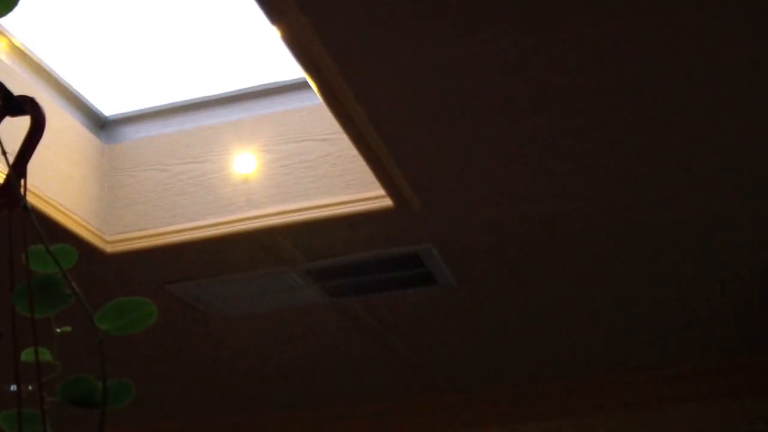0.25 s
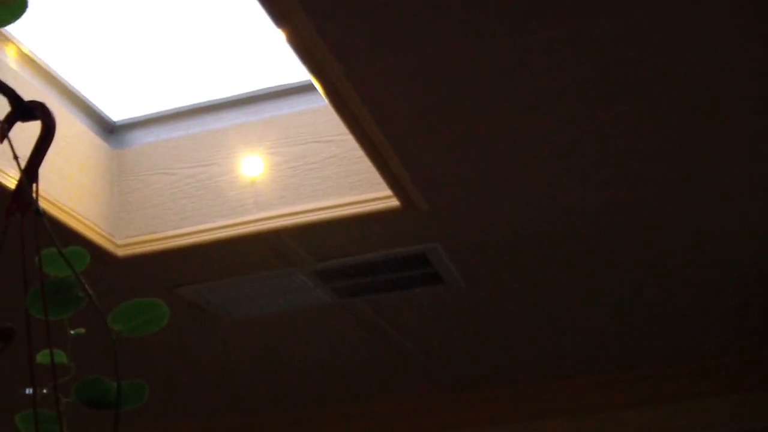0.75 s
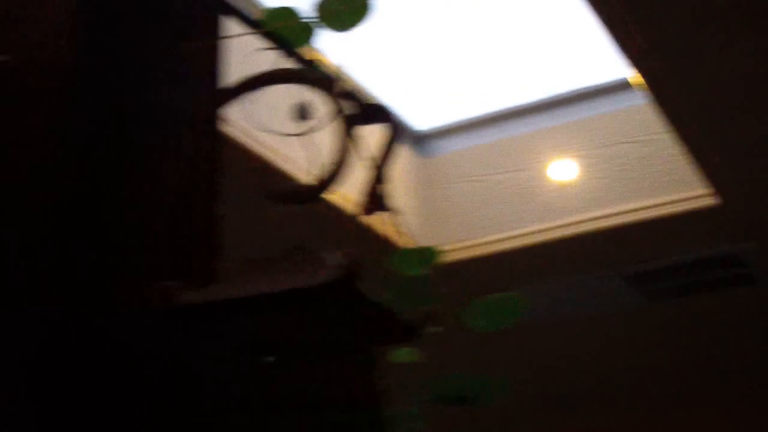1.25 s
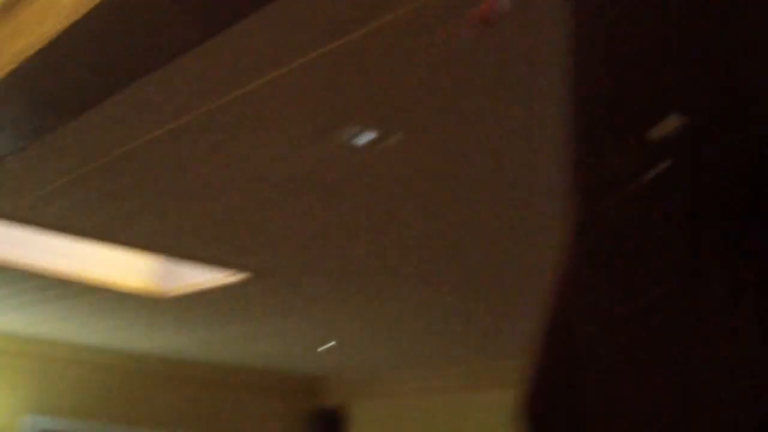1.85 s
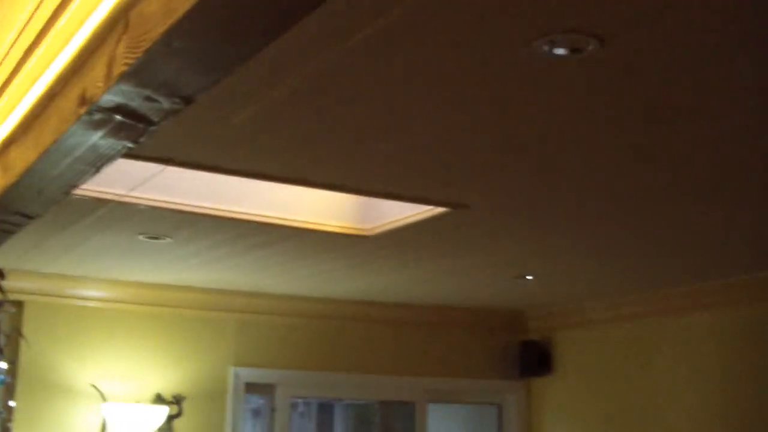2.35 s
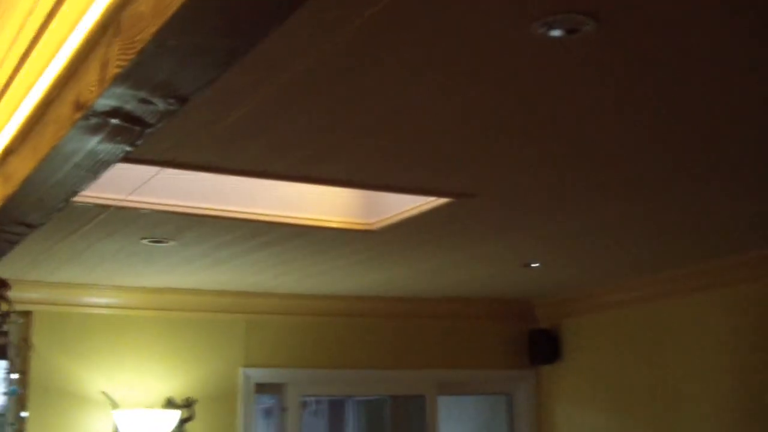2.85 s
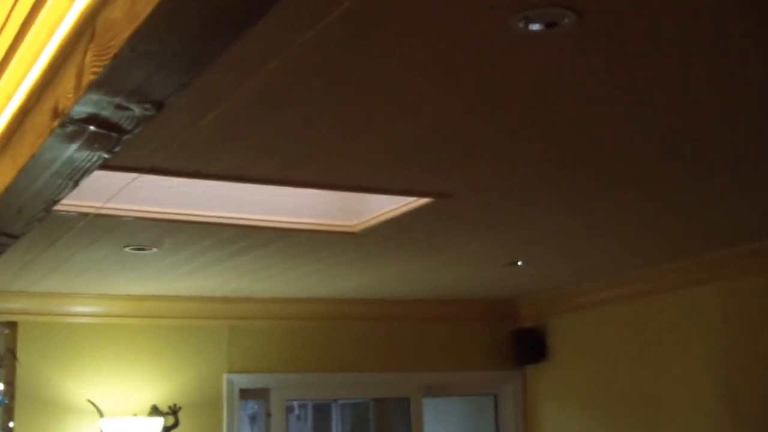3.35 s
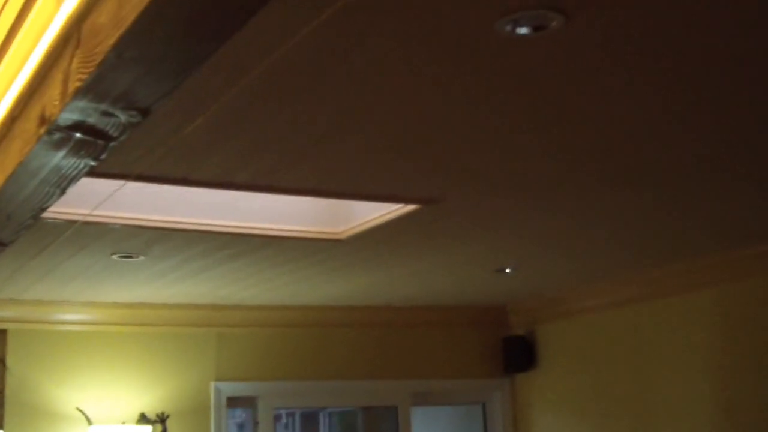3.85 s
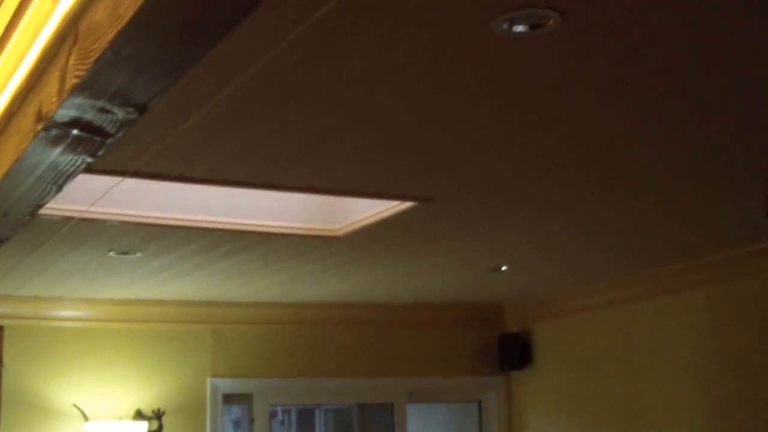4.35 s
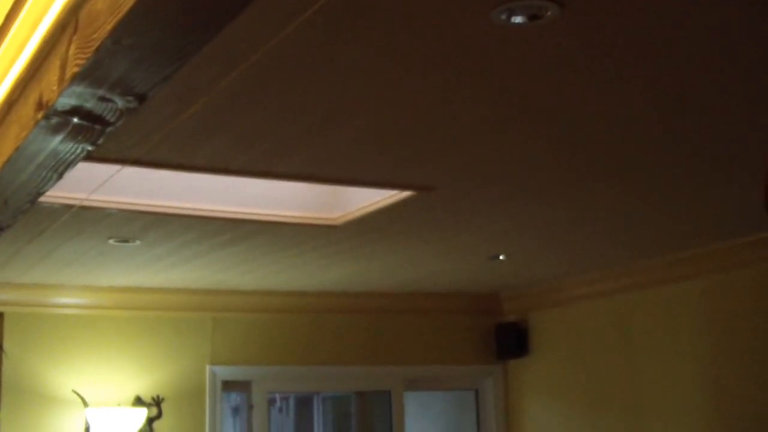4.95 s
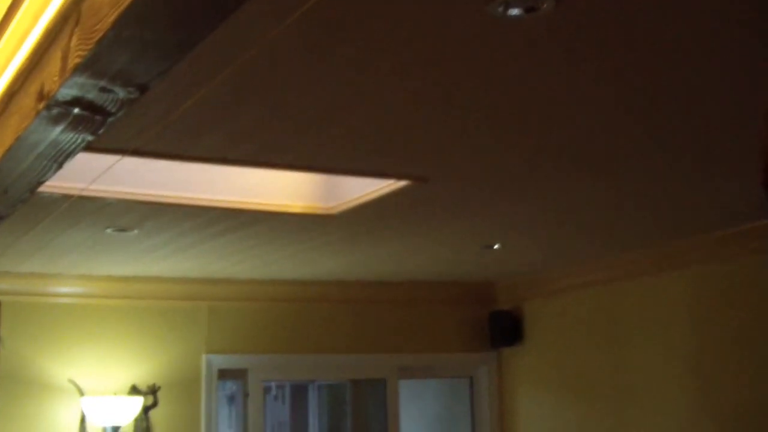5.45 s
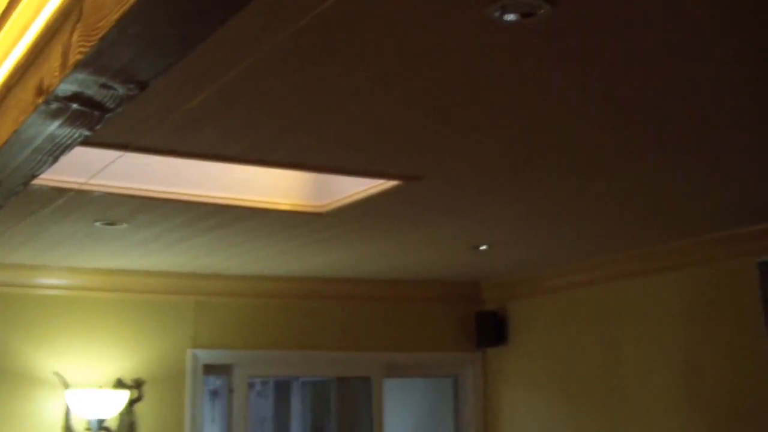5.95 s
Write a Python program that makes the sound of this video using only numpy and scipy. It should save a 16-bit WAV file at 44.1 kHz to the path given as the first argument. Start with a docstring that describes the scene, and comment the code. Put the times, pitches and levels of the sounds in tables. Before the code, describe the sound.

Two sharp, rattly clicks of a plastic light switch stand out, first off and then on, each echoing briefly around the room. Before them, a faint high ring dies away and a dull knock lands and bounces amid light rustling of cloth. The hand-held microphone picks up a brief low shudder, a few small ticks and a steady background of rumble and hum.

```python
"""A wall switch in an echoing room

A plastic switch snaps off, then on: its rocker slams, rattles and rings the plate. The limiter of a hand-held
camera turns each snap down and lets the echo of the hard walls swell back. Earlier, a thin ring fades and a few
dull knocks sound. Around them are rustling cloth, ticks, a low shudder and room hum."""
import sys
import numpy as np
from scipy import signal
from scipy.fft import rfft, irfft, next_fast_len
from scipy.io import wavfile
from scipy.ndimage import map_coordinates

SR = 44100
rng = np.random.default_rng(int(sys.argv[2]) if len(sys.argv) > 2 else 0)


def persist_wave(psi):
    """Save psi, clipped to +-1, as 16-bit WAV."""
    counts = np.round(np.clip(psi, -1, 1) * 32767).astype(np.int16)
    wavfile.write(sys.argv[1], SR, np.atleast_2d(counts).T)


N = 273861
LEAD = SR // 2  # samples of space before the start

# Background rumble and hiss: pitch_hz, relative_db
ROOM_NOISE = [(12, -36), (20, -1), (44, -0.5), (86, -6.5), (168, -7), (199, -9.5), (515, -19.5),
              (561, -17.5), (830, -20.5), (1450, -23.5), (1580, -23), (12600, -31.5), (16200, -37)]
# Narrow hums: pitch_hz, width_hz, level_db
HUMS = [(51.6, 8.7, -73), (100.8, 11.7, -55.5), (170.5, 2.5, -56.5), (471, 12, -61.5), (978, 8.3, -68.5)]
# How alike left and right are (1 = the same): pitch_hz, likeness
ROOM_LIKENESS = [(60, 0.8), (240, 0.69), (950, 0.29), (3770, 0.18), (15000, 0.019)]
ECHO_LIKENESS = [(500, 1), (3000, 1), (6000, .6), (12000, 0.19)]
# The room's echo (a fade is the time to drop 60 dB): pitch_hz, fade_s
ECHO_FADES = [(150, 0.96), (600, 0.65), (1500, 0.71), (3500, 0.63), (7000, 0.52), (14000, 0.33)]
# Sounds that come and go: peak_s, level_db, rise_db_per_s, hold_s, fall_db_per_s, end_after_peak_s
WHIR_SWELLS = [(3.6, -62, 60, .55, 45, 2), (5.47, -57.4, 130, 0.18, 130, 1)]
RUSTLE_SWELLS = [(2.03, -49, 700, .1, 11, 0.49), (2.092, -49, 900, 0.032, 400, 0.079)]
SWISH_SWELL = [(2.215, -55, 70, .06, 30, .235)]
SCRAPE_SWELL = [(1.968, -52.5, 400, .032, 450, .09)]
SHUDDER_SWELL = [(2.665, -31.5, 190, .08, 70, .2)]
DRAG_SWELL = [(2.205, -46.5, 100, .235, 120, .4)]
# Rubbing cloth: pitch_hz, relative_db
CLOTH_NOISE = [(1200, -3.5), (2200, -6), (3600, -11), (6000, -12.5), (8700, -25), (14000, -32)]
# Small ticks: start_s, peak_db, pitch_hz, width_hz, dull_body_db, fizz_db, fizz_fade_s
SMALL_TICKS = [(0.906, -60, 5000, 5000, 6, -50, 0.25), (1.533, -42, 6000, 14000, -20, -47, .1),
               (2.392, -34, 9000, 9000, -20, -49, .04), (2.7504, -28, 12500, 6000, -30, -37.5, .03),
               (2.784, -37, 1170, 500, -16, -39, .02), (4.2716, -32, 7000, 16000, 7, -49, .04),
               (5.549, -42, 10000, 8050, -20, -48, .043), (6.12, -56, 1400, 300, -18, -48, 0.1),
               (6.1534, -21, 10000, 14000, 12, -40, 0.17)]
# A thin ring: pitch_hz, level_db, fade_s, beats_per_s
THIN_RING = (2724, -54, 3, 13.5)
# Dull knocks: start_s, peak_db
KNOCK_BLOWS = [(2.0268, -15.5), (2.085, -5), (2.0982, -22), (2.122, -28), (2.1534, -22), (2.166, -33),
               (2.254, -36)]
# Notes of the knocked hollow body: pitch_hz, width_hz, relative_db
HOLLOW_NOTES = [(210, 21, 5), (473, 90, -0.5), (805, 120, -2), (1400, 68, -7), (2143, 98, -6),
                (3130, 310, -13.5)]
# Switch flips: start_s, peak_db, kind (0 off, 1 on, 2 neighbouring switch), echo_db, crack_db
# The first comes before the start, so only its echo is heard.
FLIPS = [(-.3, 20, 2, -21.5, -14), (3.0267, 27, 0, -16, -20), (4.9658, 23, 1, -19, -12.5)]
# Notes of the rocker and plate: pitch_hz, width_hz, off_db, on_db, neighbour_db
SWITCH_NOTES = [(460, 1900, -31.5, -17, -44), (910, 540, -19, -50, -20), (1090, 230, -47, -40, -13),
                (1400, 220, -18, -15, -14.5), (1760, 730, -15.5, -42, -12), (2220, 236, -14.5, -0.5, -7),
                (2615, 108, -4, 0, -5.5), (2980, 277, -10.5, -1.5, -8.5), (3343, 210, -0.5, 1.5, -3),
                (4175, 230, -2.5, 4, -7), (4840, 307, 1, 6, 1), (5056, 860, -3.5, 3, -4),
                (6020, 1110, -3.5, 3, -4), (9150, 9600, -8, -1.5, -10), (12800, 10000, -11, -14, -18)]
# Hits within one flip: delay_s, relative_db, rise_db_per_ms, fade_s
ROCKER_HITS = [(-.0038, -51, 17, 0.01), (0, 1.5, 17, 0.0038), (.003, -11, 19, 0.019)]


def amp(db):
    """Turn decibels into a gain."""
    return 10 ** (np.asarray(db) / 20)


def unit(x):
    """Scale to an average (rms) level of 1."""
    return x / np.sqrt(np.mean(x ** 2) + 1e-20)


def along(points, hz):
    """Read between a table's rows on a log pitch scale."""
    pitches, values = np.transpose(points)
    return np.interp(np.log(hz + 1), np.log(pitches + 1), values)


def filtered(x, response):
    """Shape a sound with a response that depends on frequency."""
    n = x.shape[-1]
    size = next_fast_len(n + SR // 4)
    return irfft(rfft(x, size) * response(np.fft.rfftfreq(size, 1 / SR)), size)[..., :n]


def resonances(rows):
    """A response that rings at each row's pitch_hz, width_hz, level_db."""
    return lambda f: sum((-1) ** k * amp(db) * 1j * f * width / (hz * hz - f * f + 1j * f * width)
                         for k, (hz, width, db) in enumerate(rows))


def stereo(noises, likeness, response):
    """Filter two noises and blend them into a partly alike left and right."""
    def blend(hz):
        angle = np.arccos(np.clip(along(likeness, hz), -1, 1)) / 2
        return response(hz) * np.array([np.cos(angle), np.sin(angle)])
    mid, side = filtered(noises, blend)
    return np.array([mid + side, mid - side])


def noise(response, likeness):
    """Steady, shaped stereo noise at level 1."""
    return unit(stereo(rng.standard_normal((2, N)), likeness, response))


def swell(rows):
    """A gain that rises, holds, falls and cuts off for each row."""
    gain = 0
    for peak_s, db, rise, hold_s, fall, end_s in rows:
        t = np.arange(N) / SR - peak_s
        cut_off = np.clip((end_s - t) / 0.028, 0, 1)
        gain += amp(db - rise * np.maximum(-t, 0) - fall * np.maximum(t - hold_s, 0)) * cut_off
    return gain


def echo(x, build_s):
    """The walls throw the sound back; each pitch dies at its own speed."""
    hz, t, spectrum = signal.stft(rng.standard_normal((2, SR)), SR, nperseg=256)
    tail = signal.istft(spectrum * amp(-60 * t / along(ECHO_FADES, hz)[:, None]), SR, nperseg=256)[1]
    tail = stereo(tail, ECHO_LIKENESS, np.ones_like)
    tail *= np.clip(np.arange(tail.shape[1]) / SR / build_s, 0, 1)
    return signal.fftconvolve(x[None], tail / np.linalg.norm(tail[0]), axes=1)


def add(out, sound, start_s):
    """Mix a stereo sound in at its start time."""
    part = out[:, LEAD + round(start_s * SR):][:, :sound.shape[1]]
    part += sound[:, :part.shape[1]]


def rumble():
    """Low rumble with a soft hiss on top."""
    return noise(lambda f: amp(along(ROOM_NOISE, f)), ROOM_LIKENESS)


def room_tone(grow_db_per_s=0.12, flicker_db=5.5, flickers_per_s=9):
    """Rumble, narrow hums and a faint, flickering whir that comes twice."""
    t = np.arange(N) / SR
    bed = amp(-46.5 + grow_db_per_s * t) * rumble()
    hums = sum(amp(db) * noise(resonances([(hz, width, 0)]), [(hz, .85)]) for hz, width, db in HUMS)
    band = resonances([(1298, 69, 0), (1520, 92, 0)])
    wobble = rng.standard_normal(round(N / SR * flickers_per_s) + 4)
    flicker = amp(flicker_db * map_coordinates(wobble, [t * flickers_per_s]))
    whir = flicker * swell(WHIR_SWELLS) * noise(lambda f: band(f) ** 2, [(1400, 1.0)])
    return bed + hums + whir


def handling(shudder_hz=50.25):
    """Something scrapes and cloth rubs as the camera swings; then its body shudders."""
    rub = noise(lambda f: amp(along(CLOTH_NOISE, f)), [(2000, 0.72), (9000, 0.37)])
    swish = swell(SWISH_SWELL) * noise(resonances([(8600, 2100, 0)]), [(9000, 0.45)])
    scrape_notes = resonances([(2100, 250, -9), (2420, 130, -5), (2750, 90, 1.0)])
    scrape = swell(SCRAPE_SWELL) * noise(scrape_notes, [(2500, 0.98)])
    phase = 2 * np.pi * shudder_hz * (np.arange(N) / SR - SHUDDER_SWELL[0][0])
    shudder = swell(SHUDDER_SWELL) * (np.cos(phase) + 0.65 * np.cos(phase / 2))
    return swell(RUSTLE_SWELLS) * rub + swish + scrape + shudder


def ticks(dull_hz=1630, dull_width_hz=790):
    """Each tick is a spike and a short fizz through two broad resonances."""
    out, t = np.zeros((2, LEAD + N)), np.arange(SR // 8) / SR
    for start_s, db, hz, width, dull_db, fizz_db, fade_s in SMALL_TICKS:
        body = resonances([(dull_hz, dull_width_hz, dull_db), (hz, width, 0)])
        spike = filtered(amp(-60 * t / 0.0021) * rng.standard_normal(len(t)), body)
        fizz = unit(stereo(rng.standard_normal((2, len(t))), ECHO_LIKENESS, body))
        fizz *= amp(fizz_db - 60 * t / fade_s)
        add(out, amp(db) * spike / np.abs(spike).max() + fizz, start_s)
    return out[:, LEAD:]


def thin_ring():
    """Two close tones beat against each other as they fade."""
    hz, db, fade_s, beats_per_s = THIN_RING
    t = np.arange(N) / SR
    tones = np.sin(2 * np.pi * hz * t) + 0.5 * np.sin(2 * np.pi * (hz + beats_per_s) * t)
    return amp(db - 60 * t / fade_s) * tones


def knocks(echo_db=-13):
    """Soft blows push the air and ring a hollow body, which drags as it settles."""
    out, ms = np.zeros((2, LEAD + N)), np.arange(SR // 8) / SR * 1000 - 2
    bump = lambda start_ms, length_ms: np.sin(np.pi * np.clip((ms - start_ms) / length_ms, 0, 1)) ** 2
    for start_s, db in KNOCK_BLOWS:
        contact_ms = 1.15 * amp(-0.1 * db)  # harder blows are shorter
        pull = 0.92 * amp(db) * bump(-0.73, 0.96)  # air is drawn the other way first
        push = pull - bump(0, contact_ms)
        ring = filtered(-bump(0, 0.33 * contact_ms), resonances(HOLLOW_NOTES))
        ring /= np.abs(ring).max()
        blow = filtered(push, lambda f: 1j * f / (1j * f + 120)) + 0.18 * ring
        blow -= 0.49 * np.roll(blow, round(0.00305 * SR))  # comes back off a nearby surface
        add(out, amp(db) * np.array([blow, blow]) / np.abs(blow).max(), start_s - .002)
        add(out, amp(db + echo_db) * echo(ring, build_s=0.0036), start_s - .002)
    drag = swell(DRAG_SWELL) * noise(resonances(HOLLOW_NOTES[:2]), [(500, .95)])
    return out[:, LEAD:] + drag


def switch(early_s=.008):
    """The rocker leaves its seat, slams on its stop and bounces, ringing the plate and the room."""
    out, t = np.zeros((2, LEAD + N)), np.arange(SR // 10) / SR - early_s
    rattle = sum(amp(db - np.where(t < delay, 1000 * rise * (delay - t), 60 * (t - delay) / fade_s))
                 for delay, db, rise, fade_s in ROCKER_HITS)
    for start_s, db, kind, echo_db, crack_db in FLIPS:
        plate = resonances([(hz, width, levels[round(kind)]) for hz, width, *levels in SWITCH_NOTES])
        crack = lambda f: amp(crack_db) * (1j * f / (1j * f + 2500)) ** 2 / (1 + 1j * f / 16000)
        mid, side = filtered(rattle * rng.standard_normal((2, len(t))), lambda f: plate(f) + crack(f))
        # The two microphone openings hear different treble.
        snap = mid + filtered(side, lambda f: 0.82 * f / (f + 9000)) * [[1], [-1]]
        add(out, amp(db) * snap / np.abs(snap).max(), start_s - early_s)
        ring = filtered(signal.unit_impulse(len(t)), plate)
        add(out, amp(echo_db) * unit(echo(ring, build_s=0.0048)), start_s)
    return out[:, LEAD:]


def scene():
    """All the sounds in the room together."""
    return switch() + thin_ring() + knocks() + ticks() + handling() + room_tone()


def limiter(x, release_db_per_s, attack_s):
    """The volume drops fast when a peak is too loud, then climbs steadily back."""
    need_db = np.minimum(-20 * np.log10(np.abs(x).max(0) + 1e-9), 0)
    climb_db = release_db_per_s * np.arange(N) / SR
    gain_db = np.minimum(np.minimum.accumulate(need_db - climb_db) + climb_db, 0)
    smooth = np.exp(-1 / (attack_s * SR))
    return x * amp(signal.lfilter([1 - smooth], [1, -smooth], gain_db))


def record(dry, low_hz=14, top_hz=16300):
    """Limit the snaps, add faint rumble, then trim the deepest bass, stray peaks and top treble."""
    sound = limiter(dry, release_db_per_s=167.5, attack_s=0.00011) + amp(-54) * rumble()
    sound = filtered(sound, lambda f: 1j * f / (1j * f + low_hz))
    return filtered(np.clip(sound, -1, 1), lambda f: np.clip((top_hz - f) / 400 + .5, 0, 1) ** 2)


dry = scene()
out = record(dry)
persist_wave(out)
```